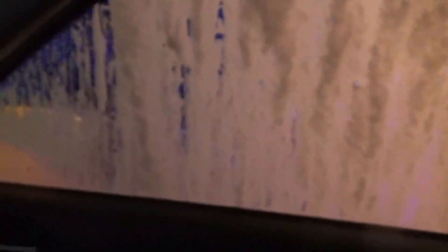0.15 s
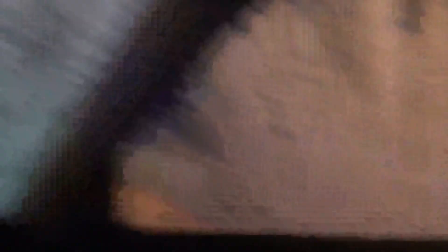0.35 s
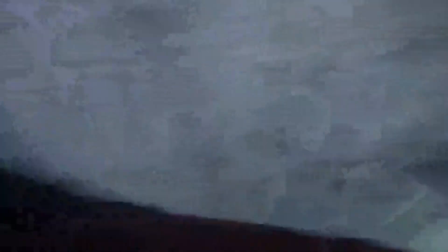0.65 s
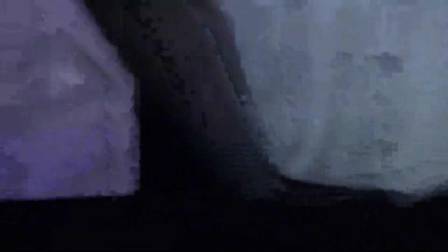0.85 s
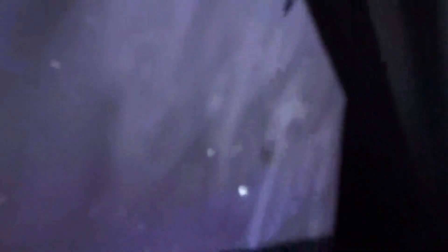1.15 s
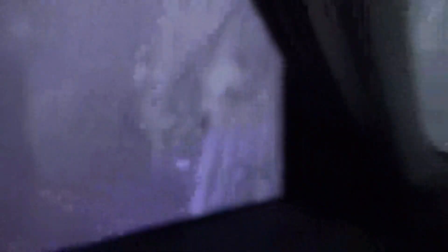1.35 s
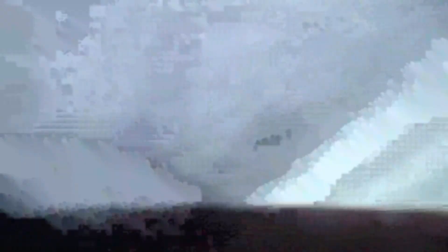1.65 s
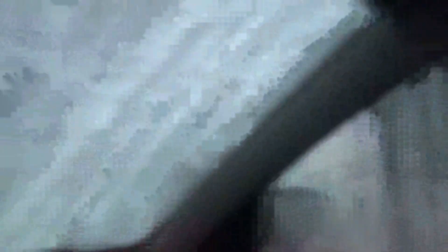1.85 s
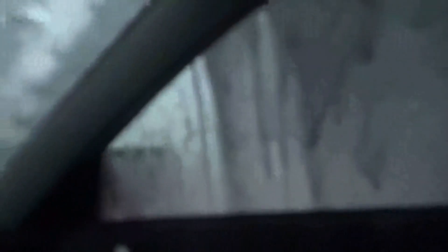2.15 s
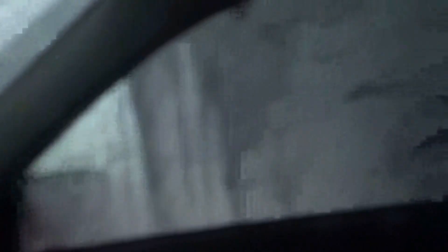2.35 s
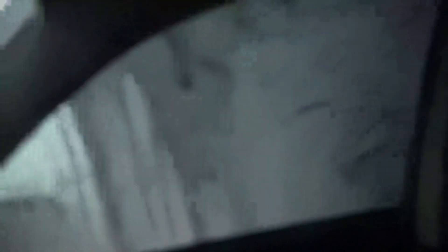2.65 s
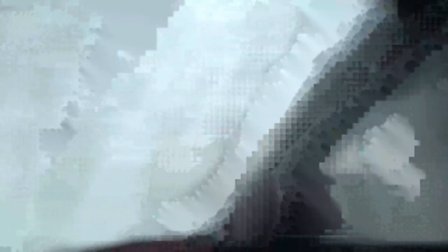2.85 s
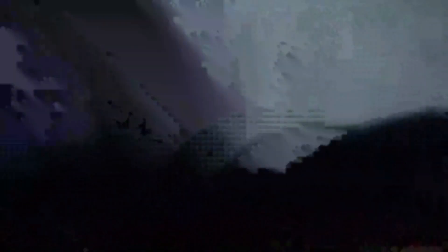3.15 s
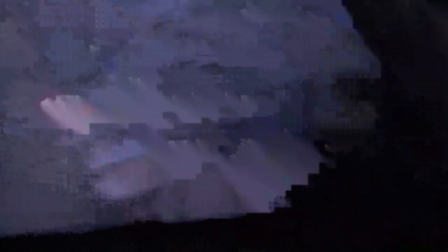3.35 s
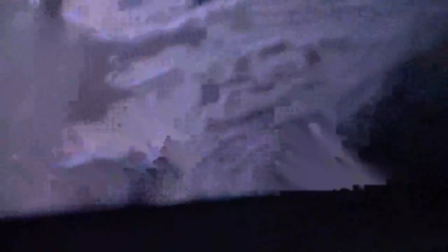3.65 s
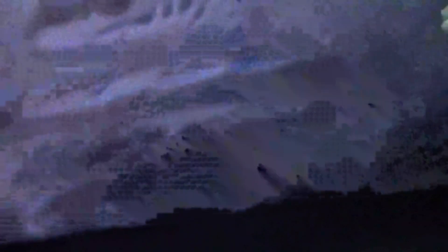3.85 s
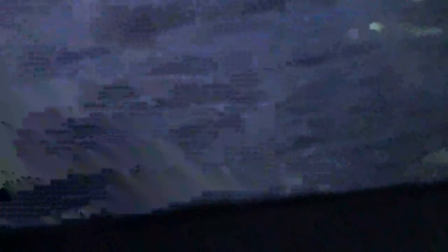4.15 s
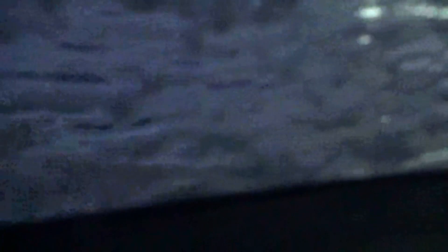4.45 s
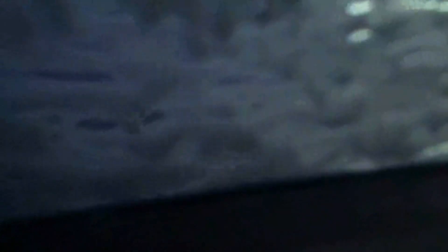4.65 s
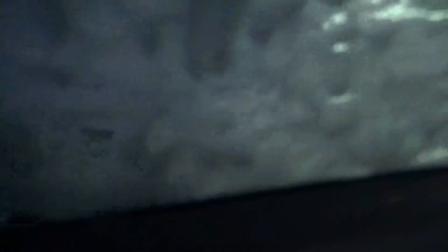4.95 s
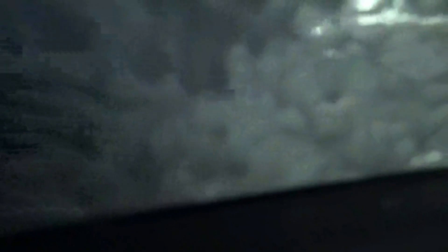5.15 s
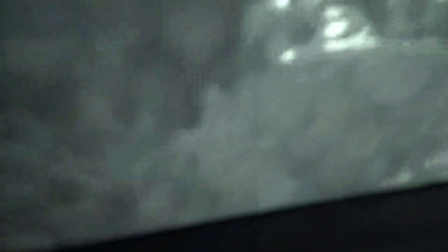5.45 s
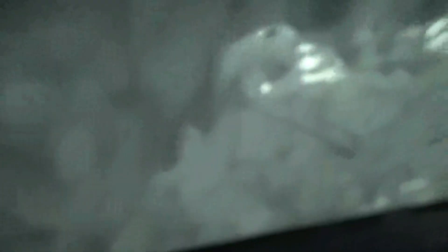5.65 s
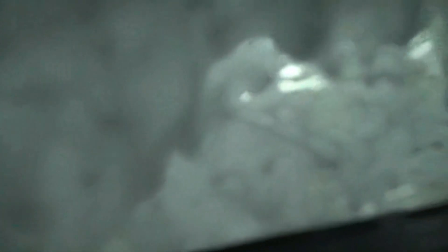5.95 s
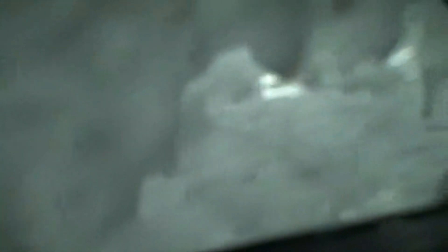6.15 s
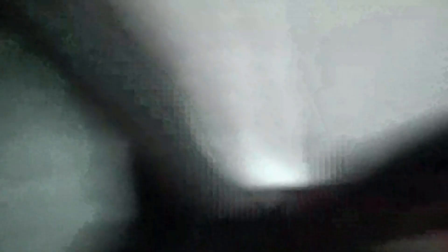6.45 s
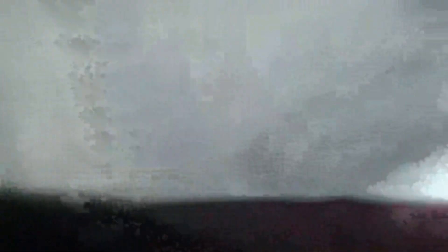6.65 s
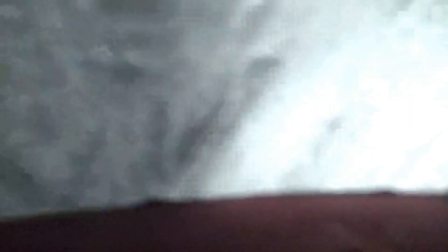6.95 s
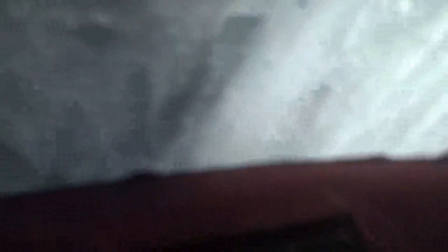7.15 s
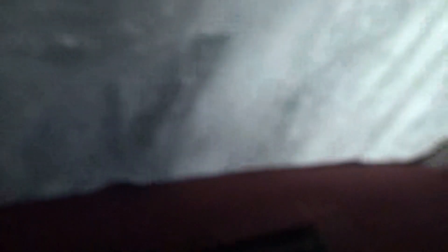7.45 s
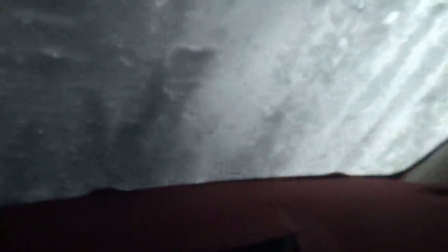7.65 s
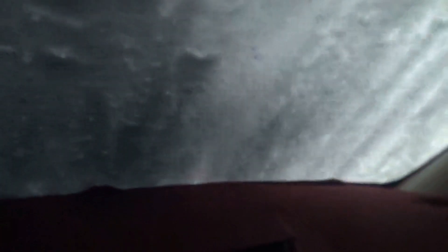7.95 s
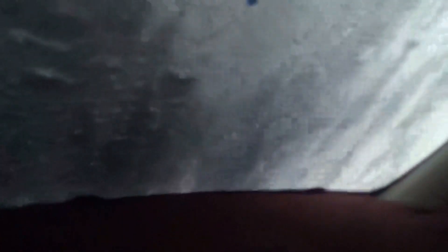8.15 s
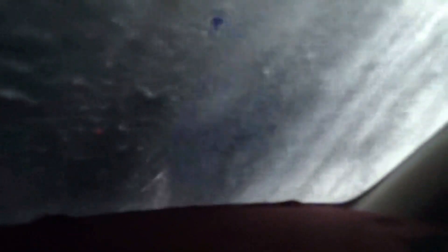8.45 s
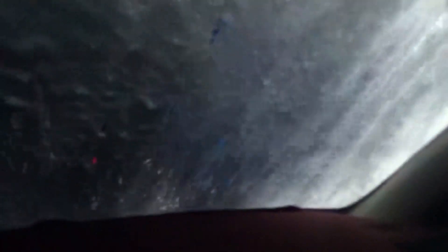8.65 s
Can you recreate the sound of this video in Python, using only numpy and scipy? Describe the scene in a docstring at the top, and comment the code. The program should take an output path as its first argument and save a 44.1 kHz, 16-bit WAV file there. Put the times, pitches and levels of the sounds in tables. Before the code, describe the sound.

From inside a closed car in a wash tunnel, spinning wet cloth scrubs the panels in a dense, muffled roar. Heavy strips flop and thud irregularly, wet ends smack the glass, and drops patter and tick under faint spray. Low booms fill the cabin. Slaps crowd together around two to four seconds, then the sound turns duller. The hand-held microphone turns, shifting balance and tone.

```python
"""Spinning cloth strips beat a closed car in a wash tunnel: shaped noise rumbles and booms in the cabin.
Wet cloth scrubs and swishes in drifting bands of noise, and spray and fizz are finer, brighter noise.
Flops, thuds, slaps and ticks are short ringing bursts; flung drops patter as small fading tones, and
one brief hiss sounds. The hand-held microphone turns about, so the balance and the cabin's boom wander."""
import sys
import numpy as np
from scipy import signal
from scipy.fft import rfft, irfft
from scipy.io import wavfile
from scipy.ndimage import uniform_filter1d

SR = 44100
rng = np.random.default_rng(int(sys.argv[2]) if len(sys.argv) > 2 else 0)


def unload_audio(sound):
    """Save the sound as a 16-bit wav file, at the path given as the first command line argument."""
    columns = np.transpose(np.atleast_2d(sound))
    # keep every value between -1 and 1, then stretch to whole-number steps
    steps = np.round(np.clip(columns, -1, 1) * 32767)
    wavfile.write(sys.argv[1], SR, steps.astype(np.int16))


N = 387198  # length of the scene [samples]

# cloth on panels and glass: (time [s], scrub level [dB], scrub brightness [dB, relative], swish level [dB])
CLOTH_CURVES = [(0.0, -14.5, 6, -22), (0.25, -16, -4, -25), (0.5, -14.5, -3, -25.5),
                (0.75, -15.5, -9.5, -24.5), (0.8, -19, 1, -32.5), (0.92, -23.5, -7, -30.5),
                (1.2, -14.5, -12.5, -32), (1.55, -22.5, -6, -27.5), (1.76, -13.5, -2, -23.5),
                (2.0, -16, -8, -26), (2.73, -17, -3.5, -26.5), (3.2, -15, -5.5, -27.5),
                (3.6, -15.5, -5.5, -25), (3.85, -16, -7, -24), (4.1, -15.5, -5, -24.5),
                (4.45, -17.5, -11, -29), (5.5, -16, -12, -30.5), (6.2, -15.5, -11.5, -29.5),
                (6.5, -19.5, -8, -28.5), (7.2, -16.5, -3, -29.5), (7.9, -16.5, -9, -30),
                (8.4, -14, -3.5, -30), (8.78, -16.5, -8, -30.5)]
# heavy strips flopping on the panels: (time [s], strength [dB], lift of the upper rings [dB])
FLOP_EVENTS = [(0.161, -15, 11), (0.225, -7, 0), (0.437, -9, 4), (0.667, -6, -9), (0.728, -3.5, -12),
               (0.979, -14, -5), (1.489, -16, 0), (1.596, -16, 13), (1.712, -11, 11), (1.733, -13, 6),
               (1.753, -8, 5), (1.806, -10, -3), (2.327, -17, 5), (2.72, -11, -6), (2.78, -6, -6),
               (2.797, -10, -6), (3.123, -13, -12), (3.232, -9, -7), (3.274, -10, -5), (3.415, -10, -3),
               (3.505, -25, -2), (3.764, -1, 6.5), (3.777, -9, 10), (3.794, -8, 9), (3.811, -14, -4),
               (3.832, -7, 7), (3.993, -6, -8), (4.182, -23, 6), (4.255, -7, -6), (4.324, -7, -3),
               (4.401, -19, -7), (4.453, -8, -5), (4.559, -14, -4), (4.606, -19, 2), (4.647, -12, 2),
               (4.702, -5, -8), (4.76, -8, 4), (4.787, -12, -1), (4.838, -16, -6), (4.914, -9, 3),
               (5.008, -9.5, -5), (5.046, -19, -1), (5.068, -21, 13), (5.136, -11, 6), (5.158, -21, 5),
               (5.265, -24, -4), (5.409, -10, -9), (5.545, -23, -5), (5.713, -31, -6), (6.046, -10, -8),
               (6.117, -8, -2), (6.255, -14, -11), (6.316, -13, -5), (6.423, -14, -4), (6.908, -23, -6),
               (7.085, -15, -1), (7.254, -24, -8), (7.401, -15, 2), (7.561, -19, -4), (7.629, -13, -7),
               (7.733, -9, -8), (7.884, -14, 4), (8.185, -11, -9), (8.29, -10, 1), (8.358, -21, -8),
               (8.511, -14, -3), (8.564, -22, -3), (8.587, -17, -1), (8.617, -10, -7), (8.65, -14, -1),
               (8.712, -10, -6), (8.745, -13, -8)]
# wet strips slapping the glass: (time [s], strength [dB], pitch [Hz], time to fade by 60 dB [s])
SLAP_EVENTS = [(0.115, -34, 2280, .07), (0.2228, -25, 2340, .07), (0.6207, -27, 2540, .09),
               (0.9882, -31, 2800, .07), (1.2138, -25, 2590, .05), (1.633, -28, 2410, .08),
               (1.732, -23, 2600, .08), (1.749, -15.5, 2350, 0.086), (1.8327, -16, 2240, 0.064),
               (1.923, -25, 2880, 0.035), (1.984, -22, 3000, 0.097), (2.063, -22, 2540, 0.092),
               (2.165, -25, 2290, .08), (2.4735, -21, 2280, .08), (2.507, -23, 2320, .07),
               (2.525, -22, 2800, 0.056), (2.592, -29, 2600, .07), (2.671, -27, 3000, .07),
               (2.695, -28, 3500, .04), (2.7182, -14, 2510, 0.031), (2.757, -15, 2500, .035),
               (2.768, -21, 2900, 0.098), (3.02, -25, 2480, .08), (3.367, -24, 2400, 0.077),
               (3.5556, -28, 2200, .07), (3.6483, -14, 2750, 0.06), (3.7267, -25, 2470, .06),
               (3.769, -16, 2700, .06), (3.782, -31, 2800, 0.046), (3.838, -20, 3160, 0.045),
               (3.842, -16, 2610, .06), (4.055, -20, 2320, .07), (4.179, -20.5, 2430, 0.065),
               (4.279, -29, 2470, .07), (4.374, -19, 2380, 0.054), (4.452, -23, 2310, 0.076),
               (4.517, -21.5, 2320, .06), (4.557, -24, 2230, 0.079), (4.66, -32, 2350, .06),
               (4.763, -27, 2420, 0.076), (4.783, -29, 2350, 0.045), (4.916, -36, 2350, 0.045),
               (5.003, -26, 3550, 0.055), (5.46, -29, 2240, .07), (5.5595, -26, 2100, .07),
               (5.625, -27, 3550, .07), (5.781, -32, 3480, .07), (6.015, -31, 3200, 0.084),
               (6.0934, -25, 2500, .05), (6.121, -25, 2350, .07), (6.171, -26, 2580, .07),
               (6.4766, -19.5, 3900, 0.049), (6.539, -18.5, 2900, 0.044), (6.8553, -16, 2570, 0.067),
               (7.0096, -16, 2400, 0.045), (7.017, -31, 3600, 0.041), (7.024, -23, 3020, 0.052),
               (7.036, -33, 2700, 0.049), (7.0816, -31, 2400, .06), (7.1333, -31, 2860, .06),
               (7.1526, -28, 2700, .06), (8.069, -28, 2090, .07), (8.54, -33, 3400, .06)]
# how hard strips beat the near window: (time [s], strength [factor])
WINDOW_BEATING = [(0, 1), (1, 0.47), (2, 0.96), (3.5, 0.98), (4.8, 0.82), (5.5, 1), (6.5, 0.34),
                  (7.5, 0.78), (8.78, 0.78)]
# the microphone turning: (time [s], left over right [dB, scaled for each source])
MIC_TURN = [(0.0, 3), (0.25, 3.5), (0.72, 8), (0.85, -2), (1.2, 2), (1.55, 0.5), (1.76, 5), (2.0, 0),
            (2.7, -2.5), (3.2, 4.5), (3.45, 0), (4.0, 0.5), (4.6, 4), (6.1, 4), (6.8, 0), (7.8, -1.5),
            (8.78, -1)]


def gain_of(db):
    """Turns decibels into a gain."""
    return 10 ** (np.asarray(db) / 20)


def evened(x):
    """Scales a signal to rms 1."""
    return x / np.sqrt(np.mean(np.abs(x) ** 2) + 1e-20)


def read(points, hz):
    """Reads a curve between its points, with frequency on a log scale."""
    f, value = np.transpose(points)
    return np.interp(np.log(hz + 1), np.log(f + 1), value)


def columns(table, t):
    """Reads every column of a curve table at times t."""
    s, *rest = np.transpose(table)
    return [np.interp(t, s, c) for c in rest]


def whole_time():
    """Time of every sample in the scene, in seconds."""
    return np.arange(N) / SR


def add(mix, s, sound):
    """Adds a two-channel sound at time s."""
    part = mix[:, max(round(s * SR), 0):][:, :sound.shape[1]]
    part += sound[:, :part.shape[1]]


def sides(pan_db):
    """Left and right gains for a balance."""
    return gain_of(np.array([pan_db / 2, -pan_db / 2]))


def mic_balance(s):
    """How far the turned microphone favours the left at time s, in dB."""
    return columns(MIC_TURN, s)[0]


def grid(size):
    """Frequencies and times of short overlapping frames, each size samples long."""
    hz = np.fft.rfftfreq(size, 1 / SR)[:, None]
    return hz, np.arange(4 * N // size + 5) * size / 4 / SR


def layer(shape_db, level_db):
    """Spreads the power of a level curve over frequency according to a colour."""
    power = gain_of(2 * shape_db) * np.ones(len(level_db))
    return power / power.sum(0) * gain_of(2 * level_db)


def field(shape, bins, frames):
    """Smooth random patches of rms 1 over frequency and time."""
    raw = rng.standard_normal(shape[::-1]).T
    across_hz = uniform_filter1d(raw, max(int(bins), 1), 0)
    return evened(uniform_filter1d(across_hz, max(int(frames), 1), 1))


def noise(power, size, count, patchy_db, patch_hz, patch_s):
    """Two partly alike channels of noise with drifting patches, made from the lowest count frequency bins."""
    # how alike left and right are: (frequency [Hz], likeness [0 to 1])
    likeness = [(30, 0.8), (45, 1), (75, 0.95), (110, 0.99), (190, 0.81), (340, 0.62), (610, 0.67),
                (1090, 0.67), (1950, 0.62), (3470, 0.61), (6200, 0.53), (11100, 0.84)]
    frames = np.zeros((2, *power.shape), complex)  # bins above count stay silent
    power = power[:count]
    a, b, c, d = rng.standard_normal((*power.shape[::-1], 4)).T
    drift = field(power.shape, patch_hz * size / SR, 4 * patch_s * SR / size)
    patches = evened(gain_of(patchy_db * drift))
    same = np.clip(read(likeness, grid(size)[0][:count]), -1, 1)
    left = a + 1j * b
    right = same * left + np.sqrt(1 - same ** 2) * (c + 1j * d)
    frames[:, :count] = np.array([left, right]) * patches
    frames[:, :count] *= np.sqrt(3 / 2 * power)  # gives the wanted rms once the frames overlap
    return signal.istft(frames, nperseg=size, noverlap=3 * size // 4)[1][:, :N]


def beating(per_s, t60, spread_db):
    """Gain of rms 1 that jumps as each strip lands, at random moments and strengths, and dies away."""
    strength = gain_of(spread_db * np.minimum(rng.exponential(1, N), 4))
    lands = strength * (rng.random(N) < per_s / SR)
    fade = signal.lfilter([1], [1, -gain_of(-60 / (t60 * SR))], lands)
    return evened(uniform_filter1d(fade, 90))


def burst(db, rings, skirt_db, rise, t60, pan_db, apart, blow):
    """A blow and a puff of noise in resonances, with a weak broad crack; apart makes the channels differ."""
    t = np.arange(4096) / SR
    f = np.fft.rfftfreq(4096, 1 / SR)
    raw = rng.standard_normal((3, 4096))
    raw = raw[0] + apart * raw[1:]
    colour = sum(gain_of(ring_db) / (1 + 1j * (f - hz) / width) ** 2 for hz, width, ring_db in rings)
    colour = colour + gain_of(skirt_db) * f / (f + rings[0][0])
    puff = evened(irfft(rfft(raw) * colour, 4096)) * (1 - np.exp(-t / rise))
    knock = irfft(colour * np.exp(-2j * np.pi * f * rise), 4096)  # the blow comes one rise time late
    fade = gain_of(db - 5.5 - 60 * t / max(t60, .004))
    return fade * (puff + blow * knock / abs(knock).max()) * sides(pan_db)[:, None]


def cabin_db(hz):
    """Lift in dB where standing waves in the cabin strengthen the sound."""
    # standing waves: (frequency [Hz], width [Hz], lift [dB])
    waves = [(53.7, 6.7, 9), (76.9, 8.1, 14.5), (125, 16.6, 8.5), (165.1, 18, 7), (194.4, 7.8, 5),
             (240, 48, 1.5), (346, 8.4, 3.5), (377, 58, 5.5), (483, 9.1, 0)]
    return sum(db / (1 + (2 * (hz - f) / width) ** 2) for f, width, db in waves)


def body():
    """Deep shudder, rumble and two booms that trade strength as the microphone moves through the cabin."""
    # body drummed by the brushes:
    # (time [s], rumble level [dB], deep shudder level [dB], lower boom level [dB], upper boom level [dB])
    body_levels = [(0.0, -23.5, -43, -36, -26.5), (0.35, -18.5, -41, -23, -23),
                   (0.7, -28.5, -43, -23.5, -26.5), (0.97, -22, -36, -21, -22), (1.1, -24.5, -38, -28, -18),
                   (1.6, -18, -33, -27, -17.5), (1.72, -25, -31, -31, -24), (1.85, -19, -35, -21, -31),
                   (2.3, -21.5, -21.5, -24, -25), (2.85, -19.5, -35, -21.5, -28),
                   (3.15, -28, -44, -23, -17), (3.5, -27, -51, -16.5, -19), (3.9, -28, -44, -30, -20),
                   (4.6, -31, -39, -25.5, -17.5), (4.95, -20.5, -32, -28.5, -18.5),
                   (5.7, -25.5, -23.5, -31, -18), (6.3, -26.5, -28, -25.5, -18),
                   (6.85, -26, -27.5, -23, -29), (7.45, -26.5, -37, -25.5, -24),
                   (7.7, -21.5, -29, -22.5, -23.5), (8.2, -28, -22.5, -19.5, -32.5),
                   (8.78, -21, -22, -25.5, -25)]
    # colour of the rumble: (frequency [Hz], relative level per Hz [dB])
    rumble_colour = [(24, -44), (40, -10.5), (70, 1), (97, -15.5), (115, -8.5), (150, -9.5), (250, -120)]
    # the booms shift as the microphone moves: (time [s], lower boom [Hz], upper boom [Hz])
    boom_pitches = [(0, 105, 171), (0.8, 124, 171), (1.1, 130, 162), (2.9, 123, 170), (3.15, 98, 163),
                    (3.75, 98, 172), (4.0, 119, 144), (4.7, 126, 164), (5.1, 123, 161), (6.4, 121, 171),
                    (6.8, 125, 174), (8.78, 121, 174)]
    # fall-off around the lower and upper boom: one value each [dB per octave squared]
    boom_falls = [96, 50]
    hz, t = grid(size=4096)
    rumble_db, deep_db, *booms_db = columns(body_levels, t)
    power = layer(-14 * np.log2((hz + 1) / 36) ** 2, deep_db)  # the shudder centres near 36 Hz
    power += layer(read(rumble_colour, hz) + cabin_db(hz), rumble_db)
    for centre, fall_db, boom_db in zip(columns(boom_pitches, t), boom_falls, booms_db):
        power += layer(cabin_db(hz) - fall_db * np.log2((hz + 1) / centre) ** 2, boom_db)
    return noise(power, size=4096, count=100, patchy_db=1.2, patch_hz=30, patch_s=.3)


def throb():
    """The strips' beat near the window: every flop and slap throws water, among lesser random landings."""
    lands = np.zeros(N)
    for s, *_ in FLOP_EVENTS + SLAP_EVENTS:
        lands[round(s * SR)] = 1
    heard = signal.lfilter([1], [1, -gain_of(-60 / (.14 * SR))], lands)  # fades by 60 dB in 0.14 s
    lesser = beating(per_s=26, t60=0.06, spread_db=1.0)
    both = evened(0.56 * uniform_filter1d(heard, 60) + 0.65 * lesser)
    return columns(WINDOW_BEATING, whole_time())[0] * both


def cloth(beats):
    """Dense scrubbing rings the panels; the thinner swish above it throbs as the strips land.
    Narrow lasting patches are the cabin's interference pattern, which shifts as the microphone moves."""
    # colours of the scrub and the swish: (frequency [Hz], relative level per Hz [dB])
    scrub_colour = [(120, -26.5), (200, -7), (221, -3), (312, -2.5), (350, -8), (490, -1), (1000, -18.5),
                    (1300, -57.5), (2200, -120)]
    swish_colour = [(470, -16.5), (800, -5.5), (1650, -14.5), (2800, -30.5), (3640, -40.5), (6160, -120)]
    # the panel ring wanders and swells as the microphone moves: (time [s], pitch [Hz], lift [dB])
    panel_ring = [(0, 400, 5), (0.35, 373, 4), (0.45, 332, 7), (0.8, 317, 5), (1.2, 340, 1.5),
                  (1.8, 369, 2), (2.7, 375, 6), (3.0, 320, 6.5), (3.5, 334, 5), (3.9, 407, 3),
                  (4.3, 312, 4.5), (4.8, 257, 4.5), (5.9, 266, 3.5), (6.3, 263, 4), (6.8, 313, 2.5),
                  (7.4, 314, 10), (8.1, 303, 3), (8.3, 297, 12), (8.6, 302, 8), (8.78, 310, -1)]
    sweeps_per_s, sweep_db = 6.9, 1  # average rate and depth as rows of cloth come round on the brush

    hz, t = grid(size=4096)
    _, bright_db, near_db = columns(CLOTH_CURVES, t)
    # a fainter swish loses its top
    edge_db = 0.43 * (near_db + 28.0) * np.clip(np.log2((hz + 1) / 1750) / 0.083, 0, 1)
    ring_hz, lift_db = columns(panel_ring, t)
    ring_db = lift_db / (1 + ((hz - ring_hz) / 35) ** 2)
    tilt_db = (bright_db + 6.5) * np.clip(np.log2((hz + 1) / 380) / 0.62, 0, 1)
    flat_db = np.zeros(len(t))
    scrub_power = layer(read(scrub_colour, hz) + cabin_db(hz) + ring_db + tilt_db, flat_db)
    swish_power = layer(read(swish_colour, hz) + edge_db, flat_db)
    scrub = noise(scrub_power, size=4096, count=220, patchy_db=2.5, patch_hz=24, patch_s=.7)
    swish = noise(swish_power, size=4096, count=600, patchy_db=2.5, patch_hz=35, patch_s=.4)

    scrub_db, _, swish_db = columns(CLOTH_CURVES, whole_time())
    turns = np.cumsum(sweeps_per_s * (1 + 0.13 * field((1, N), 1, .3 * SR)[0])) / SR
    # small random unsteadiness in the scrub's loudness
    unsteady_db = 0.44 * field((1, N), 1, 0.048 * SR)[0]
    flicker = gain_of(sweep_db * np.sin(2 * np.pi * turns) + unsteady_db)
    scrubbing = scrub * gain_of(scrub_db) * flicker * (0.9 + 0.048 * beats)
    return scrubbing + swish * gain_of(swish_db) * (0.94 + 0.5 * beats)


def flops():
    """Heavy strips land as dull thumps: a blow and a puff of noise ring a few resonances."""
    # what a flop rings, before its shift and lift: (frequency [Hz], width [Hz], level [dB])
    pane = [(912, 350, 6), (1766, 95, -1.5), (2814, 120, -16.5)]
    out = np.zeros((2, N))
    for s, db, lift_db in FLOP_EVENTS:
        shift = rng.uniform(0.97, 1.03)  # each flop's pitch varies slightly at random
        rings = [(hz * shift, width, ring_db + lift_db * (k > 0))  # the lowest ring is not lifted
                 for k, (hz, width, ring_db) in enumerate(pane)]
        add(out, s, burst(db, rings, skirt_db=-63.0, rise=0.002986, t60=0.058,
                          pan_db=1.5 * mic_balance(s), apart=0.85, blow=1.2))
    return out


def thuds():
    """Strips thud on the doors and roof: low, soft bursts that rise slowly and ring in narrow bands."""
    # thuds: (time [s], strength [dB], pitch [Hz])
    thud_events = [(0.225, -12, 460), (0.378, -8, 466), (0.66, -2.5, 452), (0.752, -13, 347),
                   (0.846, -8, 256), (1.175, -10, 385), (1.364, -13, 380), (1.599, -4, 261),
                   (2.074, -5.5, 366), (2.175, -5, 500), (2.343, -6.5, 231), (2.761, -8, 493),
                   (3.004, -5, 358), (3.125, -10, 328), (3.335, -12, 370), (3.682, -8, 396),
                   (3.913, -1.5, 355), (4.072, -1, 334), (4.142, -7, 320), (4.339, -4.5, 300),
                   (4.42, -6.5, 299), (4.565, -15, 266), (4.781, -5, 253), (4.834, -6, 406),
                   (5.059, -6.5, 304), (5.23, -6, 250), (5.413, -5, 297), (5.671, 1, 252),
                   (5.855, -13, 247), (6.195, -9, 306), (6.262, -4.5, 254), (6.358, -17, 221),
                   (6.553, -9, 486), (6.7, -2.5, 453), (6.912, -6, 430), (6.988, -9, 495), (7.301, -6, 305),
                   (7.403, -7.5, 450), (7.56, -4, 463), (7.714, -3, 223), (8.206, -16, 261),
                   (8.43, -7, 286), (8.658, -6, 272), (8.733, -5, 500)]
    # what a thud rings: (multiple of its pitch [factor], width [Hz], level [dB])
    thud_rings = [(1, 64, 1), (1.55, 150, -8), (0.62, 55, -2)]
    out = np.zeros((2, N))
    for s, db, hz in thud_events:
        rings = np.multiply(thud_rings, [hz, 1, 1])
        add(out, s, burst(db, rings, skirt_db=-67.5, rise=0.005, t60=0.15,
                          pan_db=1.1 * mic_balance(s), apart=0.55, blow=0.4))
    return out


def slaps():
    """Wet strips slap the glass: soft smacks of noise in broad bands around each slap's pitch."""
    # what a slap rings: (multiple of its pitch [factor], width [Hz], level [dB])
    slap_rings = [(1, 710, 7.5), (1.5, 350, -4), (0.7, 180, -0.5)]
    out = np.zeros((2, N))
    for s, db, hz, t60 in SLAP_EVENTS:
        rings = np.multiply(slap_rings, [hz, 1, 1])
        add(out, s, burst(db, rings, skirt_db=-51.0, rise=0.00076, t60=t60,
                          pan_db=0.87 * mic_balance(s), apart=0.84, blow=0.91))
    return out


def ticks():
    """Drops tick on the window: brief bright clicks in very broad bands."""
    # ticks: (time [s], strength [dB], pitch [Hz])
    tick_events = [(0.0707, -27, 5600), (0.2708, -28, 7970), (0.3581, -28, 8920), (0.91, -24, 6270),
                   (1.0365, -29, 6770), (1.054, -18, 6400), (1.1268, -26, 10300), (1.8961, -33, 8820),
                   (1.923, -16.5, 6100), (2.9073, -28, 5680), (3.375, -20, 5640), (3.468, -29, 6060),
                   (3.5229, -27, 7800), (3.6544, -22, 5580), (3.9509, -27, 6950), (4.4523, -27, 8230),
                   (4.556, -31, 8820), (4.7611, -30, 5610), (5.0035, -23, 6270), (6.1719, -29, 5620),
                   (6.477, -40, 8000), (6.541, -23, 5760), (6.8564, -28, 9000), (6.8646, -13.5, 9100),
                   (7.028, -35, 8000), (8.2244, -33, 8500), (8.4374, -22.5, 5920), (8.443, -27, 5900),
                   (8.54, -37, 5500)]
    # what a tick rings: (multiple of its pitch [factor], width [Hz], level [dB])
    tick_rings = [(1, 2800, -1.5), (0.62, 1100, 1.5)]
    out = np.zeros((2, N))
    for s, db, hz in tick_events:
        rings = np.multiply(tick_rings, [hz, 1, 1])
        add(out, s, burst(db, rings, skirt_db=3.0, rise=0.0012, t60=0.016,
                          pan_db=.1 * mic_balance(s), apart=0.26, blow=0.85))
    return out


def patter(beats):
    """Flung drops and strip ends each ring a spot of glass briefly; more land when a strip beats."""
    t, out = np.arange(2048) / SR, np.zeros((2, N))
    lands = rng.random(N) < 420 * (.3 + .7 * beats) / SR
    size = gain_of(4.4 * np.minimum(rng.exponential(1, N), 4)) * lands
    spot = rng.integers(0, 20, N)
    for k, hz in enumerate(np.geomspace(560, 4600, 20)):
        dull_db = -8 * np.log2(hz / 1000)  # the glass passes less of the higher rings
        ring = np.sin(2 * np.pi * hz * t) * gain_of(dull_db - 60 * t * hz / 40)  # 60 dB down in 40 cycles
        soft_ring = ring * (1 - np.exp(-t / 0.00031))
        out[k % 2] += signal.oaconvolve(size * (spot == k), soft_ring)[:N]
    swish_db = columns(CLOTH_CURVES, whole_time())[2]
    return gain_of(swish_db - 2.5) * evened(out + 0.36 * out[::-1])  # some of each side reaches the other


def water(beats):
    """Fine even spray and fizz on the glass, flung in bursts by the strips and flecked by small drops."""
    # water on the glass, before the bursts scale it: (time [s], spray level [dB], fizz level [dB])
    water_levels = [(0.0, -40, -50), (0.4, -44, -53.5), (0.9, -42.5, -52.5), (1.07, -40.5, -48.5),
                    (1.4, -42.5, -54.5), (1.93, -40, -54), (2.3, -41.5, -60), (2.9, -41.5, -55.5),
                    (3.15, -43.5, -57), (3.63, -44, -56), (3.98, -39.5, -51), (4.55, -46.5, -58),
                    (6.07, -46, -61.5), (6.3, -46.5, -59.5), (7.2, -45.5, -61), (7.85, -45, -61),
                    (8.78, -47.5, -62.5)]
    # colours of the spray and the fizz: (frequency [Hz], relative level per Hz [dB])
    spray_colour = [(1350, -26.5), (2300, -3.5), (3730, -9), (6500, -25.5), (8450, -56.5), (14300, -120)]
    fizz_colour = [(3240, -35), (5500, -22.5), (6590, -4.5), (9940, -7.5), (10600, -11.5), (11200, -17.5),
                   (14600, -42), (22000, -120)]
    mottle_db = 1.7
    hz, t = grid(size=1024)
    spray_db, fizz_db = columns(water_levels, t)
    spray_power = layer(read(spray_colour, hz), spray_db)
    fizz_power = layer(read(fizz_colour, hz), fizz_db)
    spray = noise(spray_power, size=1024, count=280, patchy_db=mottle_db, patch_hz=90, patch_s=0.061)
    fizz = noise(fizz_power, size=1024, count=280, patchy_db=mottle_db, patch_hz=90, patch_s=.1)
    busy = columns(WINDOW_BEATING, whole_time())[0]
    drops = beating(per_s=87, t60=0.058, spread_db=-3.5) * busy ** 2
    return spray * (0.78 + 0.27 * beats + 0.58 * drops) + fizz * (0.48 + 0.14 * beats + 0.27 * drops)


def hiss():
    """A short, faint, even hiss of noise in narrow bands, strongest near 4.6 kHz."""
    # bands of the hiss: (frequency [Hz], width [Hz], level [dB])
    hiss_bands = [(4560, 210, 3), (3700, 250, -8), (5700, 700, -9)]
    start_s, length_s, edge_s, level_db = 7.785, 0.235, 0.05, -55
    f, t = np.fft.rfftfreq(N, 1 / SR), whole_time() - start_s
    colour = sum(gain_of(db) / (1 + ((f - hz) / width) ** 2) for hz, width, db in hiss_bands)
    raw = rng.standard_normal((3, N))
    steady = evened(irfft(rfft(raw[0] + 0.6 * raw[1:]) * colour, N))
    shape = np.clip(np.minimum(t, length_s - t) / edge_s, 0, 1)
    return gain_of(level_db) * steady * shape


def scene():
    """Mixes all sources; all but the hiss follow the turning of the microphone, each by its own amount."""
    beats = throb()
    pan_db = mic_balance(whole_time())
    near = (cloth(beats) + patter(beats)) * sides(pan_db) + water(beats) * sides(.6 * pan_db)
    hits = flops() + thuds() + slaps() + ticks()
    return body() * sides(0.48 * pan_db) + near + hits + hiss()


def record(dry):
    """Quick gain control evens the roar, a soft ceiling rounds peaks, then the highest treble is cut."""
    edge_hz = 11150
    power_db = 10 * np.log10(abs(uniform_filter1d((dry ** 2).mean(0), 1300)) + 1e-12)
    evened_out = dry / gain_of(0.29 * np.maximum(power_db + 12.0, 0))  # acts only above -12 dB
    soft = np.tanh(evened_out)
    low_pass = signal.firwin(511, edge_hz, window=("kaiser", 9), fs=SR)
    return signal.oaconvolve(soft, low_pass[None], "same")


dry = scene()
out = record(dry)
unload_audio(out)
```